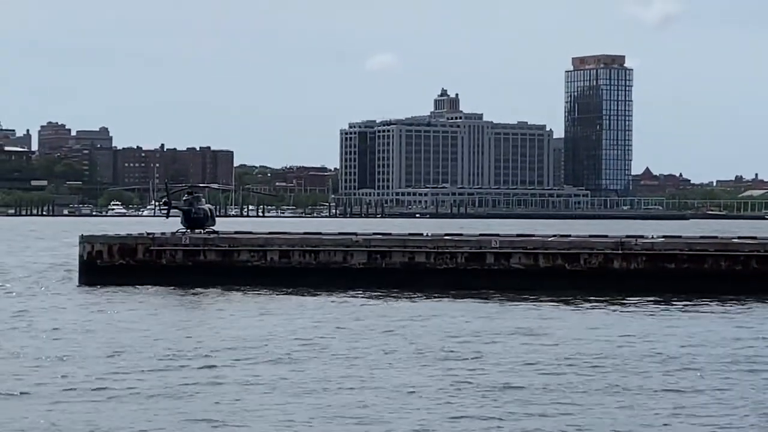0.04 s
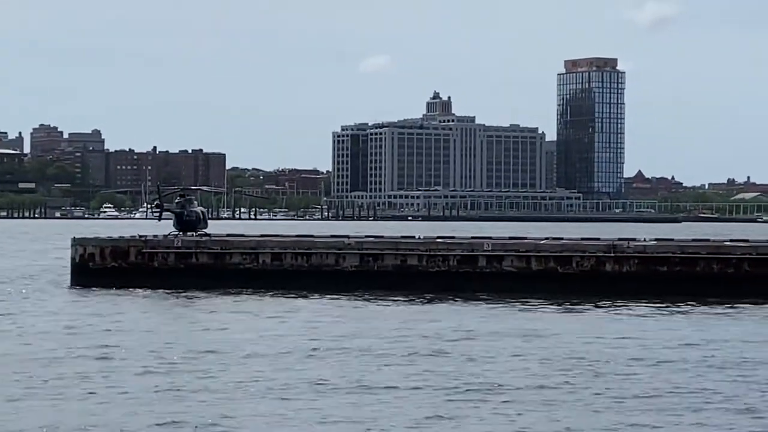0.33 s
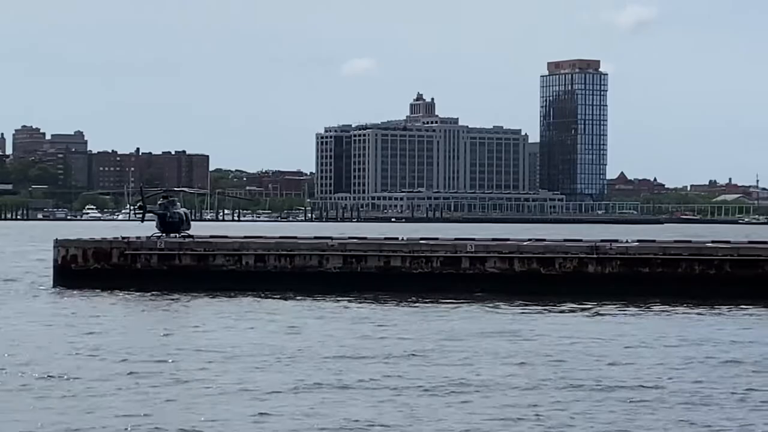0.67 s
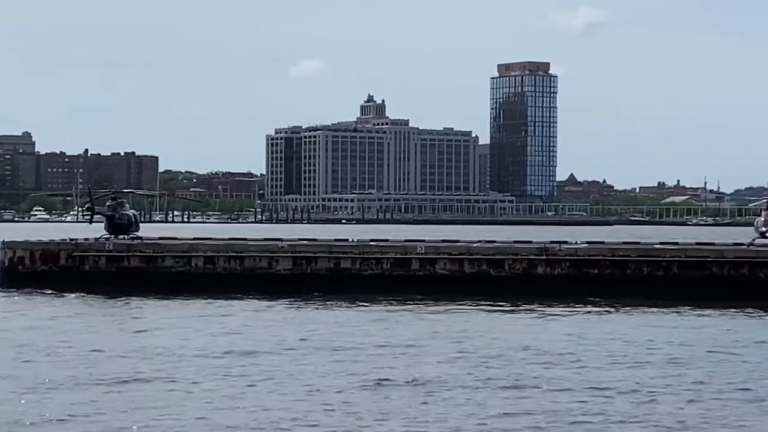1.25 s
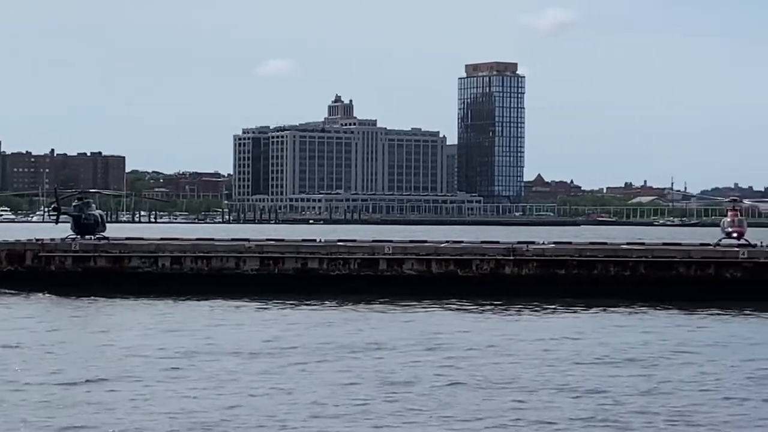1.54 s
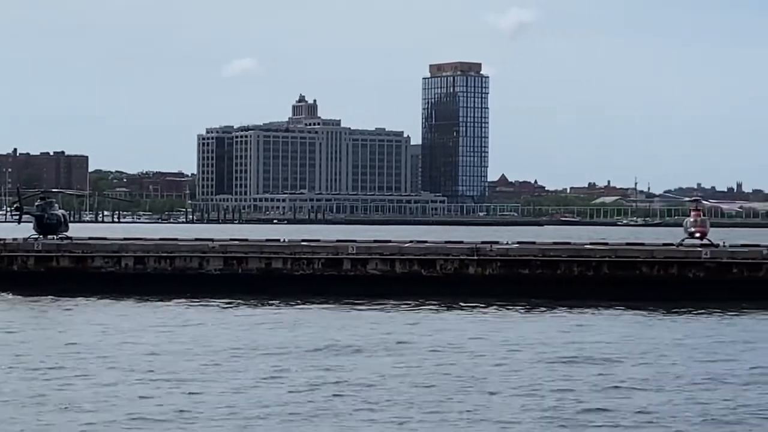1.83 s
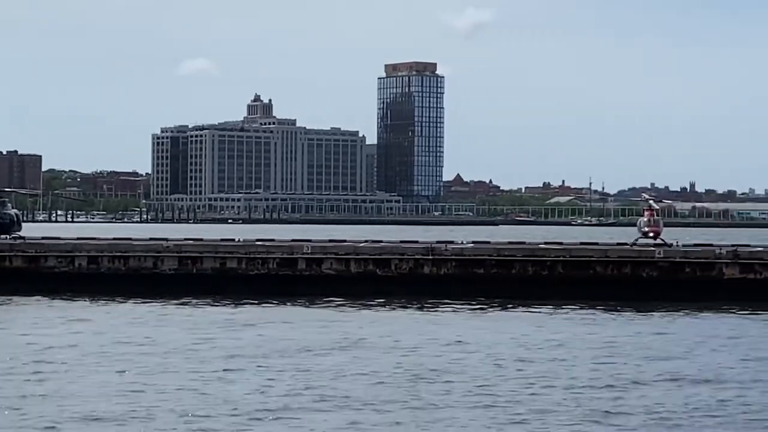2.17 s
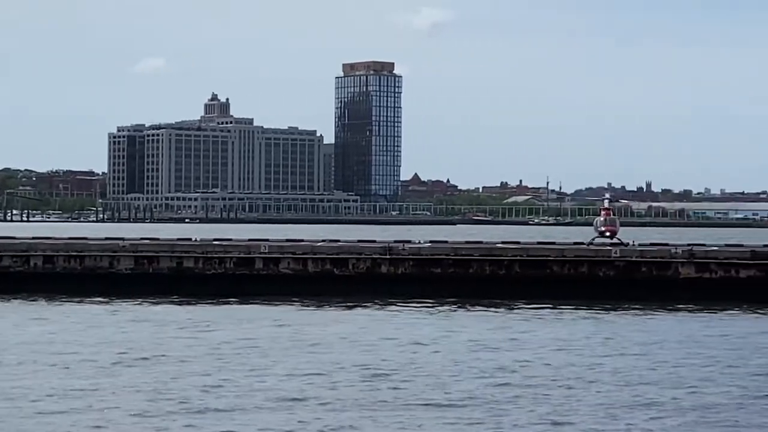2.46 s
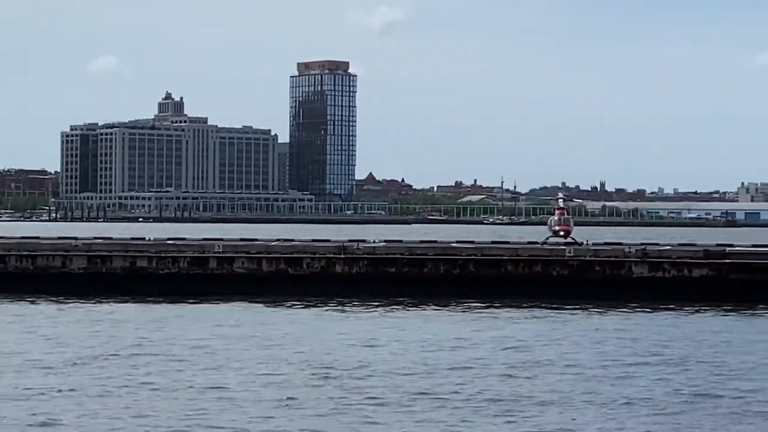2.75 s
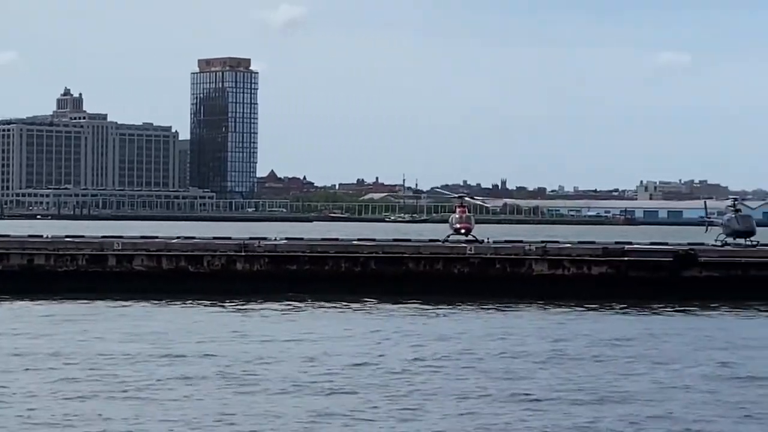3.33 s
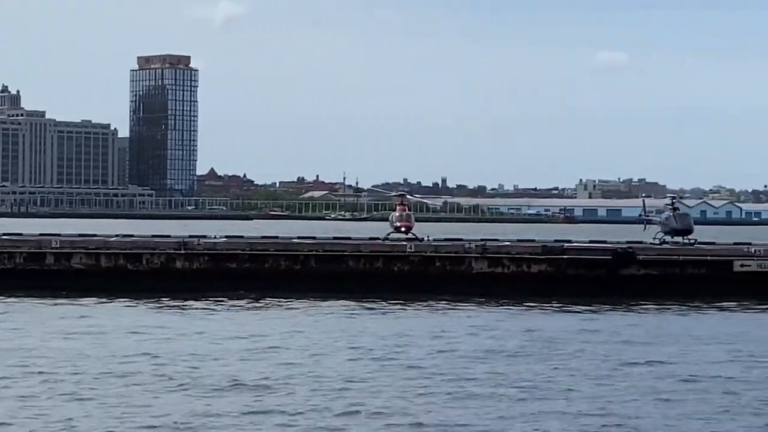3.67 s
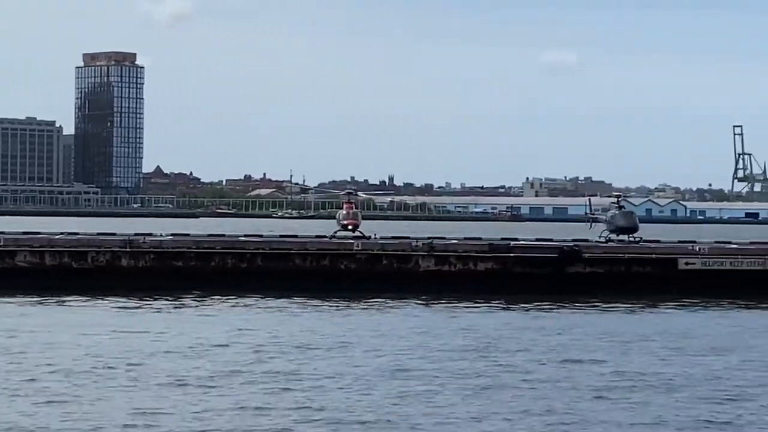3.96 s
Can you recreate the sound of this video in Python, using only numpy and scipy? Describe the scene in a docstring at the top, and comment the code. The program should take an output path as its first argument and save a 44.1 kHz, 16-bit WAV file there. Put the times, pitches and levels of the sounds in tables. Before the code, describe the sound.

A helicopter spools up on a pier, with chopping blades, low rumble and whistling turbines.

```python
"""On a pier, heard across open water, a turbine helicopter spools up with others idling beside it.
Its blades chop the air faster and faster, now and then with a hard slap. The air they stir up
makes a lumpy low rumble, gusts and thumps, and the exhaust adds a growing roar.
The turbines hiss with thin steady whistles, and one high whine climbs with the rotor."""
import sys
import numpy as np
from scipy import signal
from scipy.fft import rfft, irfft
from scipy.io import wavfile
from scipy.ndimage import uniform_filter1d

SR = 44100
rng = np.random.default_rng(int(sys.argv[2]) if len(sys.argv) > 2 else 0)


def wrap_up_sound(samples):
    """Save the sound to the file named by the first command line argument, as 16-bit audio."""
    columns = np.atleast_2d(samples).T
    # keep every value between -1 and 1, then stretch to whole-number steps
    tamed = np.clip(columns, -1, 1)
    steps = np.round(tamed * 32767).astype(np.int16)
    wavfile.write(sys.argv[1], SR, steps)


N = 176400
TIME = np.arange(N) / SR
FREQUENCIES = np.arange(N // 2 + 1) * SR / N


def from_db(db):
    """Turn decibels into a number to multiply by."""
    return 10 ** (np.asarray(db) / 20)


def rms_one(x):
    """Scale a signal so that its average strength (rms) is 1."""
    return x / np.sqrt(np.mean(x ** 2) + 1e-20)


def in_time(rows):
    """Join (time, value) rows with straight lines, one value per sample."""
    return np.interp(TIME, *np.transpose(rows))


def gain_at(rows, hz):
    """Read the gain at any frequency from (Hz, dB) rows."""
    row_hz, db = np.transpose(rows)
    return from_db(np.interp(np.log(hz + 1), np.log(row_hz), db))


def bell(peak_s, width_s):
    """A smooth swell of height 1 around a moment."""
    return np.exp(-.5 * ((TIME - peak_s) / width_s) ** 2)


def drift(rate_hz):
    """A random wobble of strength 1, mostly slower than the given rate."""
    white = rfft(rng.standard_normal(N))
    return rms_one(irfft(white / (1 + (FREQUENCIES / rate_hz) ** 2), N))


def evened(noise, window_s=.09):
    """Hold a noise near strength 1, so it has few swells of its own."""
    power = uniform_filter1d(np.mean(noise ** 2, axis=0), int(window_s * SR))
    return noise / np.sqrt(power + 1e-12)


# How wide the sound is. Each row: frequency in Hz, level of the side part against the middle in dB.
STEREO_WIDTH = [(40, -17), (150, -12.5), (400, -11.5), (700, -11), (1200, -5), (1500, -4), (2000, -11.5),
                (2500, -19), (4000, -30), (7000, -30), (7800, -11), (12000, -11)]

def air_noise(spectrum):
    """Swirling air: stereo noise shaped by a spectrum, with strength near 1."""
    mid, side = rfft(rng.standard_normal((2, N))) * gain_at(spectrum, FREQUENCIES)
    mid = irfft(mid, N)
    side = irfft(side * gain_at(STEREO_WIDTH, FREQUENCIES), N)
    return np.array([mid + side, mid - side]) / np.std(mid)


def whistle(hz, level_db, breath, width_hz):
    """A clean tone mixed with noise close to its pitch; breath is the noise's share, 0 to 1."""
    flutter = drift(width_hz) + 1j * drift(width_hz)
    waver = np.sqrt(1 - breath) + np.sqrt(breath / 2) * flutter
    phase = 2 * np.pi * np.cumsum(hz + np.zeros(N)) / SR
    wave = np.sqrt(2) * from_db(level_db) * waver * np.exp(1j * phase)
    side = wave.imag * drift(5.1) * gain_at(STEREO_WIDTH, np.mean(hz))
    return np.array([wave.real + side, wave.real - side])


# How fast the rotor turns. Each row: time in seconds, blade passes per second.
BLADE_PASS_RATE = [(0, 18.08), (1, 18.86), (2, 19.865), (3, 20.44), (4, 21.67)]
# How loud the chop is. Each row: time in seconds, level in dB.
CHOP_LOUDNESS = [(0, -43), (.6, -42), (1.05, -37), (2, -37.5), (2.4, -37), (3.1, -38.5), (4, -36.5)]
# The tone colour of chops and slaps. Each row: frequency in Hz, relative level in dB.
BLADE_SPECTRUM = [(100, -10), (250, 1), (420, -3), (660, 0), (1000, -4), (1400, -7), (1950, -8),
                  (2500, -16), (4000, -22), (12000, -40)]

def blade_chop(gap_s=.0075, width_s=.0032, jitter_s=.001, scatter_db=1.1):
    """Every passing blade throws two close puffs of air, each with its own strength."""
    blade_count = .05 + np.cumsum(in_time(BLADE_PASS_RATE)) / SR
    pass_times = np.interp(np.arange(1, int(blade_count[-1]) + 1), blade_count, TIME)
    power = np.zeros(N)
    for pass_s in pass_times:
        for offset_s in (-gap_s / 2, gap_s / 2):
            centre_s = pass_s + offset_s + rng.normal(0, jitter_s)
            strength = from_db(rng.normal(0, scatter_db))
            centre = int(centre_s * SR)
            near = slice(max(centre - SR // 20, 0), centre + SR // 20)
            power[near] += strength ** 2 * np.exp(-.5 * ((TIME[near] - centre_s) / width_s) ** 2)
    puffs = rms_one(np.sqrt(power))
    return from_db(in_time(CHOP_LOUDNESS)) * puffs * air_noise(BLADE_SPECTRUM)


# How loud the rumble and the gusts are. Each row: time in seconds, level in dB.
RUMBLE_LOUDNESS = [(0, -26.5), (.25, -25.5), (.38, -28.5), (.5, -28), (.66, -27), (.85, -25.5), (1.15, -26),
                   (1.36, -28.5), (1.52, -22.5), (1.83, -28), (1.92, -27.5), (2.3, -25), (2.5, -27),
                   (2.8, -27.5), (3.33, -22), (3.52, -26), (3.7, -26.5), (4, -27.5)]
GUST_LOUDNESS = [(0, -32.5), (.6, -32.5), (1.2, -30), (1.45, -32), (2.05, -31), (2.3, -32.5), (2.7, -31),
                 (3.1, -31), (3.26, -32), (4, -26.5)]
# Their tone colours. Each row: frequency in Hz, relative level in dB.
RUMBLE_SPECTRUM = [(18, -60), (31, -37), (40, -28), (50, 3.5), (60, 0), (80, -2), (110, -0.5), (145, -13.5),
                   (220, -21.5), (1000, -98)]
GUST_SPECTRUM = [(70, -19), (150, 2), (230, 0.5), (290, -1.5), (345, -9), (450, -41), (2500, -84)]

def rotor_rumble():
    """Air churned by the rotor rumbles, and the wind it blows down gusts an octave or two higher."""
    rumble = from_db(in_time(RUMBLE_LOUDNESS)) * evened(air_noise(RUMBLE_SPECTRUM))
    gusts = from_db(in_time(GUST_LOUDNESS)) * air_noise(GUST_SPECTRUM)
    return rumble + gusts


# How loud the roar and the rasp are. Each row: time in seconds, level in dB.
ROAR_LOUDNESS = [(0, -35), (.7, -34), (1.4, -34.5), (1.9, -33.5), (2.4, -31.5), (3, -32.5), (3.7, -31),
                 (4, -31)]
RASP_LOUDNESS = [(0, -55), (.7, -49), (1.3, -43), (1.8, -41.5), (2.3, -41), (2.8, -41), (3.3, -41.5),
                 (4, -45)]
# Their tone colours. Each row: frequency in Hz, relative level in dB.
ROAR_SPECTRUM = [(200, -4), (380, -4.5), (640, -0.54), (780, -3), (950, -8), (1300, -11.5), (1900, -19),
                 (2500, -22.5), (4100, -19), (5000, -33.5), (9000, -66)]
RASP_SPECTRUM = [(800, -15), (1150, -3.5), (1500, -2.5), (1950, -1), (2450, -13), (3400, -9.5),
                 (4400, -12.5), (12000, -54)]

def exhaust(rough_db=.5):
    """The exhaust roars with a higher rasp on top, both slightly ragged."""
    roar = from_db(in_time(ROAR_LOUDNESS)) * air_noise(ROAR_SPECTRUM)
    rasp = from_db(in_time(RASP_LOUDNESS)) * air_noise(RASP_SPECTRUM)
    return from_db(rough_db * drift(100)) * (roar + rasp)


# How loud the hiss and the sizzle are. Each row: time in seconds, level in dB.
HISS_LOUDNESS = [(0, -43), (.35, -39), (.7, -44), (1.2, -42), (1.8, -41), (2.4, -46), (2.8, -42),
                 (3.3, -51.5), (4, -42.5)]
SIZZLE_LOUDNESS = [(0, -46.5), (.2, -44.5), (.38, -41.5), (.58, -42), (.75, -45), (.88, -42.5), (1.15, -46),
                   (1.52, -44.5), (2.15, -44.5), (2.45, -46.5), (2.8, -44.5), (3.3, -48), (4, -46)]
# Their tone colours. Each row: frequency in Hz, relative level in dB.
HISS_SPECTRUM = [(400, -14), (1500, -1.5), (2300, 3), (2700, 4.5), (3100, 4.5), (4200, -0.5), (4900, -2.5),
                 (7000, -13), (10000, -20)]
SIZZLE_SPECTRUM = [(3000, -33), (4400, -3), (5400, 1.5), (6000, .5), (6450, 3), (6900, 1.5), (7600, 0),
                   (8250, -0.5), (8900, -12.5), (10000, -6), (11200, -11), (12400, -16)]

def turbine_hiss():
    """The turbines hiss, with a brighter sizzle above."""
    hiss = from_db(in_time(HISS_LOUDNESS)) * air_noise(HISS_SPECTRUM)
    sizzle = from_db(in_time(SIZZLE_LOUDNESS)) * air_noise(SIZZLE_SPECTRUM)
    return hiss + sizzle


# The gears' whistles. Each row: pitch in Hz, level in dB, time of the swell in seconds,
# size of the swell in dB, width of the breathy noise in Hz.
GEAR_TONES = [(1346, -55, 2.4, 7, 25), (3392, -62, 3.9, 6.5, 8), (4159, -59.5, 2.73, 7, 50),
              (6335, -65, 1.5, 4, 25), (9621, -69, .85, 4.5, 14)]

def gear_whistles():
    """Gears whistle at steady pitches, and each whistle swells once."""
    out = np.zeros((2, N))
    for hz, db, swell_s, swell_db, width_hz in GEAR_TONES:
        level_db = db + swell_db * bell(swell_s, width_s=.22)
        out += whistle(hz, level_db, breath=.68, width_hz=width_hz)
    return out


# How loud the compressor is. Each row: time in seconds, level in dB.
COMPRESSOR_LOUDNESS = [(0, -71.5), (1.3, -61), (1.75, -51), (2.15, -57), (2.9, -52), (3.5, -60), (4, -58)]

def compressor_whistle(hz=7485):
    """The compressor, which squeezes air into the engine, holds one high note."""
    return whistle(hz, in_time(COMPRESSOR_LOUDNESS), breath=.75, width_hz=26)


# How the whine climbs. Each row: time in seconds, pitch in Hz.
WHINE_CLIMB = [(0, 11570), (1, 11840), (2, 12065), (3, 12170), (4, 12230)]
# How loud the whine and the air intake are. Each row: time in seconds, level in dB.
WHINE_LOUDNESS = [(0, -62), (.4, -54.5), (.75, -62), (1, -56.5), (1.35, -62), (1.7, -55), (2.3, -62),
                  (3, -60), (3.4, -66), (4, -64)]
INTAKE_LOUDNESS = [(0, -57), (.3, -46), (.6, -48.5), (.78, -54), (1, -49), (1.3, -47), (1.5, -57),
                   (1.8, -51.5), (2.15, -49.5), (2.5, -57), (4, -70)]

def turbine_whine(intake_ratio=.2236):
    """As the turbine speeds up, its whine and a lower, breathy intake whistle climb together."""
    whine_hz = in_time(WHINE_CLIMB)
    intake = whistle(intake_ratio * whine_hz, in_time(INTAKE_LOUDNESS), breath=.9, width_hz=80)
    whine = whistle(whine_hz, in_time(WHINE_LOUDNESS), breath=.8, width_hz=70)
    return intake + whine


# The thumps. Each row: time of the peak in seconds, level in dB, puff level against the thump in dB.
WIND_THUMPS = [(.1, -20.5, -9), (.47, -21.5, -11), (.99, -17.5, -13), (1.66, -20, -16), (1.82, -20, -14),
               (2.169, -22, -5), (2.228, -27, 3.5), (2.355, -20.5, -1.5), (2.94, -24, -6), (3.235, -22, -1),
               (3.62, -22, -8), (3.99, -22, -6)]
# The tone colours of thump and puff. Each row: frequency in Hz, relative level in dB.
THUMP_SPECTRUM = [(20, -50), (42, -10), (62, 2), (100, .5), (160, -15), (1500, -90)]
PUFF_SPECTRUM = [(80, -25), (155, 2), (265, -1), (400, -15), (3000, -80)]

def wind_thumps():
    """Now and then the rotor's wind arrives as a low thump with a puff of air above it."""
    low = evened(air_noise(THUMP_SPECTRUM))
    puff = evened(air_noise(PUFF_SPECTRUM))
    out = np.zeros((2, N))
    for peak_s, db, puff_db in WIND_THUMPS:
        out += from_db(db) * bell(peak_s, width_s=.021) * (low + from_db(puff_db) * puff)
    return out


# The hardest blade slaps. Each row: start in seconds, peak level in dB.
HARD_SLAPS = [(.805, -23), (.863, -28), (.918, -28), (1.078, -21.5), (1.184, -26.5), (1.234, -29),
              (1.284, -27.5), (1.594, -28), (2.164, -26), (2.346, -25), (2.408, -27), (2.505, -24.5),
              (2.604, -27), (2.701, -23.5), (3.096, -26), (3.425, -25), (3.574, -24), (3.823, -25.5)]

def blade_slaps(rise_s=.0014):
    """A blade that cuts the swirling air left by the one before gives a short crack."""
    envelope = np.zeros(N)
    for start_s, db in HARD_SLAPS:
        age = np.clip((TIME - start_s) / rise_s, 0, 20)  # the crack peaks at age 1
        envelope += from_db(db) * age * np.exp(1 - age)
    return envelope * air_noise(BLADE_SPECTRUM)


def scene():
    """Rotor and engines together."""
    rotor = blade_chop() + blade_slaps() + rotor_rumble() + wind_thumps()
    engines = exhaust() + turbine_hiss() + gear_whistles() + compressor_whistle() + turbine_whine()
    return rotor + engines


# Which side is louder. Each row: frequency in Hz, left level minus right level in dB.
MIC_BALANCE = [(60, .1), (270, .9), (600, -1.3), (850, -.3), (1120, -2.6), (1600, -.2), (2150, -1.6),
               (2600, 0)]
# Which side is ahead. Each row: frequency in Hz, how far the right wave leads in radians.
MIC_PHASE = [(0, 0), (430, .4), (780, .3), (1350, 1.1), (1800, .4), (2300, 0), (7450, 0), (7700, .9),
             (8900, 3.14), (10000, 4.5), (11000, 6.28), (11500, 6.4), (12400, 8.1)]

def record(dry, cutoff_hz=12350):
    """The microphone's two openings differ in level and timing, and the highest treble is cut."""
    margin = SR // 10
    padded = np.pad(dry, ((0, 0), (margin, margin)), mode="reflect")
    size = padded.shape[1]
    hz = np.arange(size // 2 + 1) * SR / size
    right_lead = np.interp(hz, *np.transpose(MIC_PHASE))
    # Each side takes half of the difference, in opposite directions.
    left_gain = np.sqrt(gain_at(MIC_BALANCE, hz)) * np.exp(-.5j * right_lead)
    heard = irfft(rfft(padded) * np.array([left_gain, 1 / left_gain]), size)
    treble_cut = signal.ellip(10, .3, 70, cutoff_hz, fs=SR, output="sos")
    return signal.sosfilt(treble_cut, heard)[:, margin:margin + N]


dry = scene()
out = record(dry)
wrap_up_sound(out)
```